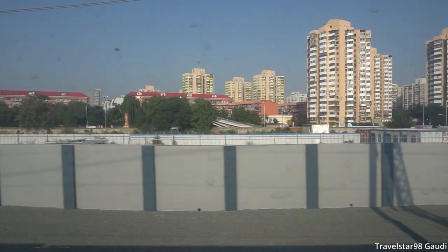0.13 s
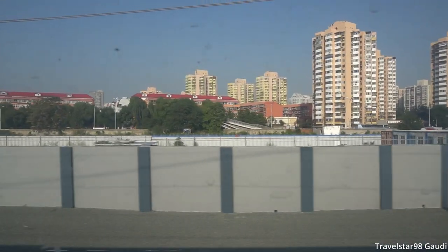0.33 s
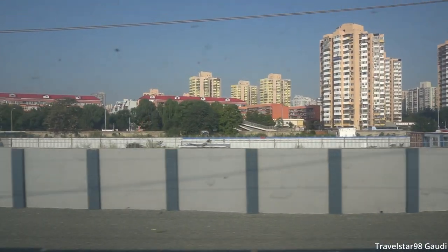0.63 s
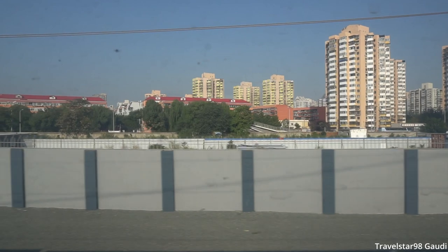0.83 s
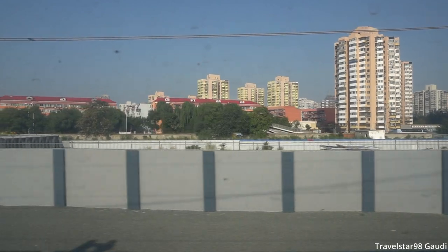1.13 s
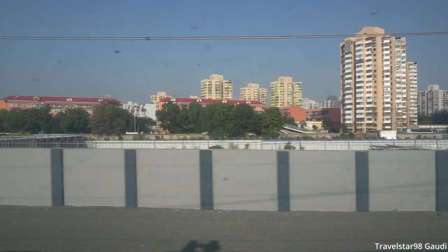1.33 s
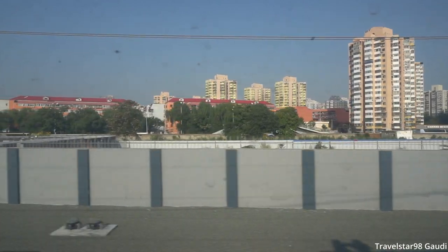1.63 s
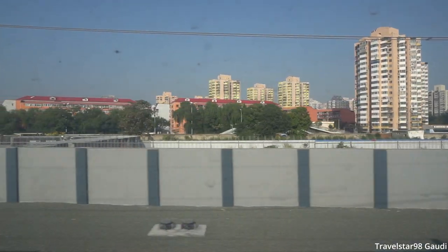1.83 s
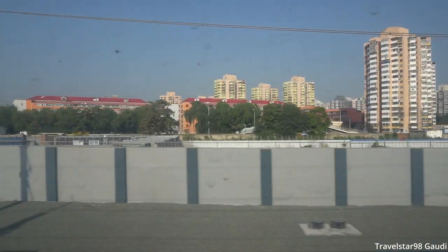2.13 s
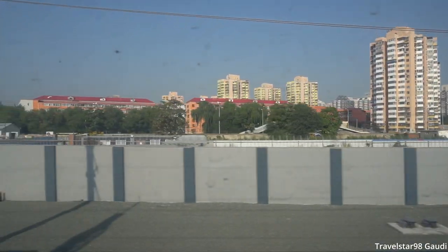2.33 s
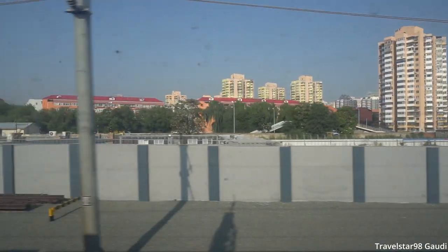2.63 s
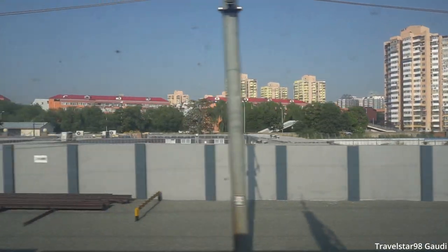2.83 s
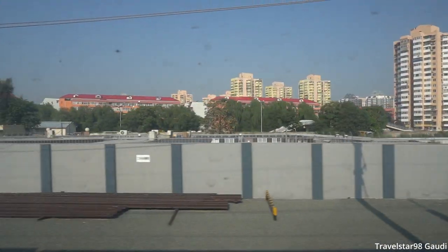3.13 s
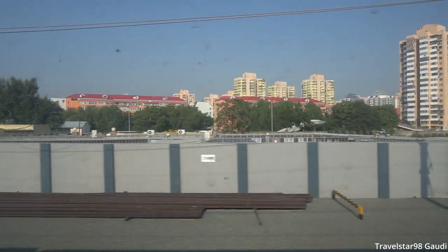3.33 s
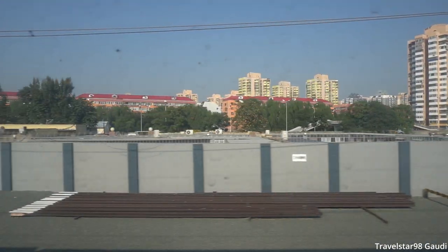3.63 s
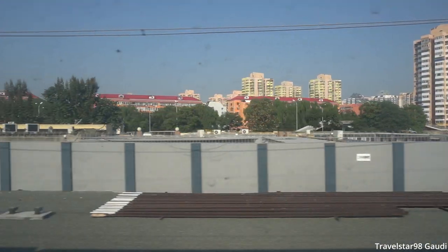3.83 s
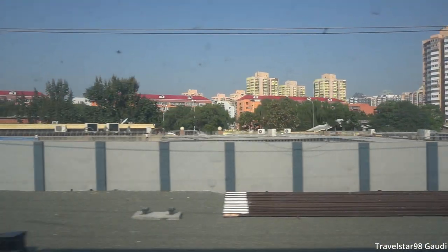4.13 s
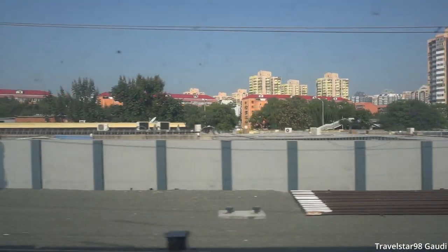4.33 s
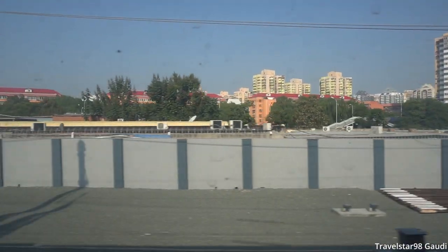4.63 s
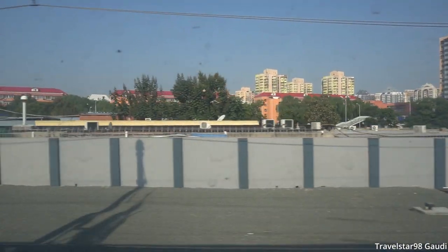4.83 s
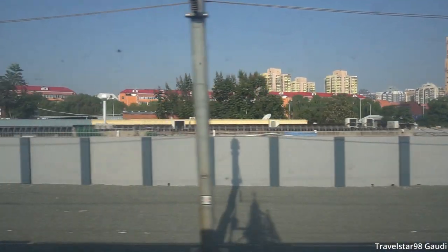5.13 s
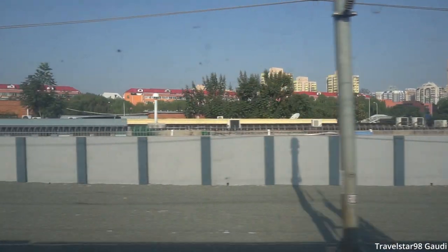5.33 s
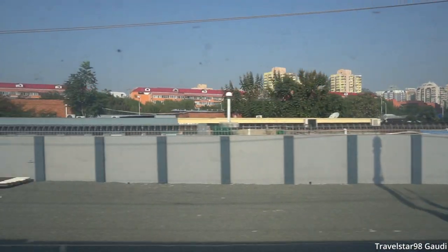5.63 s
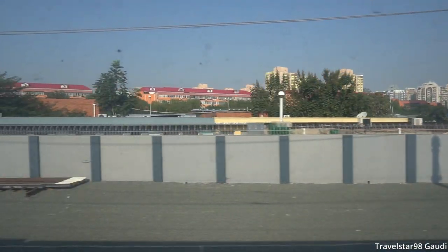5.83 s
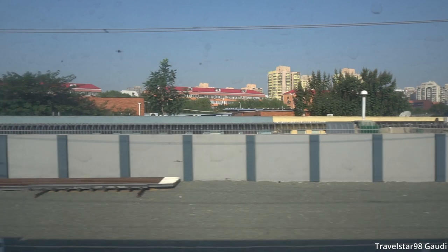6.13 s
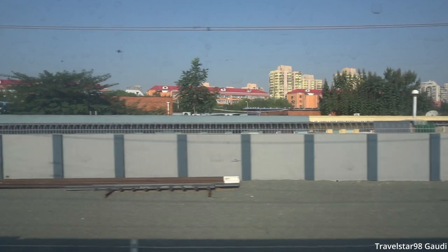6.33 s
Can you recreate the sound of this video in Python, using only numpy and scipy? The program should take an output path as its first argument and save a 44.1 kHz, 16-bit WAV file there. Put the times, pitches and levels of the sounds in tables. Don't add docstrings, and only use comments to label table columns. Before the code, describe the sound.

Inside a moving passenger train, a continuous low rumble dominates, its floor boom wavering gently under a softer, duller wheel roar. Muffled thuds over rail joints come irregularly, the firmest as a close double knock just before two seconds, then more near two and a half. Panels hum in short swells, fittings creak faintly and a loose part ticks. Two close microphones in the carriage add a light hiss.

```python
import sys
import numpy as np
from scipy import signal
from scipy.fft import rfft, irfft
from scipy.io import wavfile
from scipy.ndimage import uniform_filter1d

SR = 44100
rng = np.random.default_rng(int(sys.argv[2]) if len(sys.argv) > 2 else 0)


def file_out(sig):
    cols = np.atleast_2d(sig).T
    lim = np.clip(cols, -1, 1)
    pcm = np.round(lim * 32767).astype(np.int16)
    wavfile.write(sys.argv[1], SR, pcm)


def voltage_ratio(level):
    return 10 ** (np.asarray(level, float) / 20)


N = 285768
HZ, T = np.fft.rfftfreq(N, 1 / SR), np.arange(N) / SR

# t/s, level/dB
RAIL_ROUGHNESS = [(0.0, 3.5), (0.6, -0.2), (1.4, 1), (1.65, 2.2), (1.9, 4.5), (2.3, 2.5), (2.6, 2),
                  (2.95, 3), (3.2, 3), (3.6, 1), (3.95, 1), (4.25, 1.3), (4.6, -0.3), (5.2, 0.8),
                  (5.55, 0.9), (6.1, 0.5), (6.48, -1)]
# t/s (peak), floor boom level/dB, suspension sway level/dB, boom f/Hz
RAIL_DIPS = [(0.07, -34.5, -45, 82.15), (0.33, -33, -56, 93.4), (0.451, -37.5, -36, 90.2),
             (0.612, -30.5, -30.5, 83.8), (0.78, -33, -36, 90.6), (0.932, -35, -40, 85),
             (1.08, -53, -36, 83.4), (1.39, -37, -34, 79.24), (1.64, -37, -50, 68.76),
             (1.858, -31, -31, 98.75), (1.968, -35, -33, 83), (2.091, -37, -34, 92.84),
             (2.2, -30, -28, 91.7), (2.39, -37, -33, 89.9), (2.51, -30.5, -35.5, 82.5),
             (2.72, -34, -33, 76), (2.88, -29.5, -45, 77.9), (2.93, -25.5, -42, 77.75),
             (2.975, -24.5, -32, 82.3), (3.089, -33, -31, 84.6), (3.48, -35.5, -48, 83),
             (3.691, -34, -48, 79), (3.86, -50, -45, 75), (4.1, -56, -38, 71.56), (4.24, -43, -36, 77.97),
             (5.518, -36, -38, 88), (5.67, -49, -34, 79.7), (5.85, -33.5, -43, 74.5),
             (6.04, -31.5, -47, 81.7), (6.46, -33, -61, 79.4)]
# f/Hz, level/dB (per Hz)
SWAY_SPECTRUM = [(7.1, -46), (12, -16), (32, 0.5), (70, 2), (91, -25), (150, -120)]
# f/Hz, level/dB (per Hz)
BODY_SPECTRUM = [(60, -45), (110, 3), (135, -12), (172, -12.5), (200, -5.5), (260, -9), (320, -13.5),
                 (450, -15), (540, -25), (630, -30.5), (800, -49)]
# f/Hz, width/Hz, level/dB
BODY_MODES = [(101.3, 12, 8), (122, 40, -2), (431, 4.5, -12), (482, 25, -19.5), (571, 77, -35)]
# f/Hz, level/dB (per Hz)
ROAR_SPECTRUM = [(450, -2.5), (590, -4), (635, -10.5), (690, -2.5), (800, -5), (1100, -10.5), (1300, -13.5),
                 (1700, -12.5), (2300, -17.5), (3300, -20), (4500, -26), (6000, -35)]
# f/Hz, width/Hz, level/dB
WHEEL_MODES = [(875, 17, -2), (1083, 44, -5.5), (1404, 31, -12), (1520, 17, -8), (2068, 62, -14.5),
               (2710, 120, -15.5), (3600, 46, -17.5)]
# f/Hz, width/Hz, level/dB
HUM_MODES = [
    [(197.8, 19.7, 1), (222.5, 13, -2)],
    [(374.8, 24.5, 3)],
    [(714.5, 24.6, 11)],
    [(1750, 43, -2.5), (1811, 38, -1)],
    [(152.8, 30.4, 2)],
]
HUM_REST_DB = [-51, -57.5, -69, -75, -54.5]
HUM_FOLLOWS = [1.63, 0.9, 0.7, 0.4, 1.5]
# t/s (peak), level/dB, hold/s
SIDE_HUMS = [(0.135, -50, 0.13), (0.688, -44.5, 0.04), (0.877, -45, 0.031), (1.398, -46, 0.037),
             (2.033, -44.5, 0.044), (2.36, -45, 0.069), (3.0, -40.5, 0.116), (3.544, -52, 0.042),
             (3.702, -40.5, 0.045), (4.544, -48, .04), (5.195, -46.5, 0.044)]
# t/s (peak), level/dB, hold/s
ROOF_HUMS = [(0.79, -59, 0.032), (1.22, -60, .25), (1.7, -48, 0.025), (1.84, -46, .05),
             (2.34, -48.5, 0.062), (2.73, -47, 0.061), (2.98, -65, 0.042), (3.74, -54, 0.033),
             (4.24, -56, 0.021), (5.15, -50.5, 0.15), (5.52, -52.5, .25)]
# t/s (peak), level/dB, hold/s
RIM_HUMS = [(0.17, -69, 0.022), (0.58, -68, .04), (1.0, -57, 0.022), (1.2, -61.5, .08), (1.7, -60, .12),
            (2.36, -58.5, 0.14), (2.78, -62, .03), (3.1, -57.5, 0.076), (3.66, -58.5, 0.16),
            (4.17, -64, 0.026), (4.3, -61, 0.2), (4.66, -66, .15), (5.2, -63, .1)]
# t/s (peak), level/dB, hold/s
WEB_HUMS = [
    (0.16, -73, 0.09),
    (0.58, -66, .05),
    (3.0, -67, 0.29),
    (4.17, -67, .04),
    (4.66, -75, 0.061),
    (6.05, -71, 0.2),
]
# t/s (peak), level/dB, hold/s
SEAT_HUMS = [
    (1.58, -42, 0.044),
    (2.25, -44, .1),
    (2.62, -40.5, 0.04),
    (2.85, -44, .06),
    (3.0, -46, .06),
    (3.85, -43, .03),
    (4.2, -42.5, 0.046),
    (4.35, -43, 0.091),
    (6.15, -47.5, .06),
]
# t/s, blow level/dB, brightness level/dB (at 1 kHz), hold/s
JOINTS = [(0.54, -44, -4.5, 0.033), (0.954, -42, -3.5, 0.054), (1.331, -47, 6.5, .022),
          (1.664, -35.5, 0, 0.043), (1.809, -30, 3, 0.04), (1.864, -36.5, -7, 0.013),
          (2.577, -42.5, 6.5, 0.012), (2.709, -42.5, 6.5, 0.061), (2.77, -46.5, 0, 0.022),
          (3.079, -44, 2.5, 0.043), (3.683, -46.5, -21, 0.034), (4.298, -54, -4, 0.055),
          (5.845, -53.5, 11, 0.06)]
# f/Hz, level/dB (per Hz)
THUD_SPECTRUM = [(65, -32), (110, 0.5), (199, 4.5), (229, -3.5), (297, -10), (410, -5), (652, -18.5),
                 (714, -29.5), (771, -25), (1040, -30), (1260, -41), (1570, -40.5), (2400, -56),
                 (3120, -83), (5280, -120)]
# t/s, panel level/dB, wheel level/dB, pitch factor [1]
KNOCKS = [
    (1.659, -36, -52, 0.85),
    (1.689, -34, -62, 0.98),
    (1.809, -29, -49.5, 0.93),
    (1.868, -32.5, -61, 0.96),
    (2.586, -35, -65, 1.006),
    (2.618, -32.5, -73, 0.84),
]
# f/Hz, width/Hz, level/dB, length/s
PANEL_NOTES = [(201.6, 54, 0.7, 0.03), (282, 56, -15.5, 0.034), (405, 77, -14, 0.031)]
# f/Hz, width/Hz, level/dB, length/s
WHEEL_NOTES = [(933, 170, -2.5, 0.048), (1530, 51, -6, 0.053), (1770, 70, -11, 0.046),
               (2080, 90, -16.5, 0.048)]
# t/s, level/dB, f/Hz, width/Hz, length/s
CREAKS = [(0.065, -53.5, 490, 12.4, 0.31), (0.288, -61, 1770, 27, 0.07), (.5, -57, 446, 7.9, 0.27),
          (1.177, -59.5, 1740, 28, 0.055), (1.546, -36.5, 113.3, 10, 0.22), (1.931, -60, 1400, 40, 0.023),
          (2.733, -52, 363, 45, 0.026), (2.809, -53, 700, 180, 0.015), (2.92, -73, 4003, 38, 0.099),
          (3.021, -74, 3590, 60, 0.28), (3.039, -56, 955, 40, 0.028), (4.15, -44.5, 145.3, 45, 0.31),
          (4.452, -74, 3570, 93, 0.5), (5.82, -63, 1165, 72, 0.031), (6.423, -57, 2080, 230, 0.18)]
# f/Hz, left-right level/dB
CREAK_LEAN = [(150, 1.5), (500, 0.3), (1800, -2.2)]
# t/s, peak level/dB, f/Hz, length/s, left-right level/dB
TICKS = [
    (0.117, -65, 8350, 0.0034, -3),
    (2.741, -63.5, 10500, 0.0052, -3.5),
    (2.836, -58, 10200, 0.0024, -6),
    (3.277, -63, 10300, .005, -5),
    (3.3274, -58.5, 10000, 0.005, -5),
    (4.265, -70.5, 9500, 0.052, -3.5),
]
# f/Hz, level/dB (per Hz)
HISS_SPECTRUM = [(880, -37), (1500, -1), (1860, 0), (2350, -10), (4080, -8.5), (4400, -9.5), (11000, -12),
                 (14300, -54), (22000, -120)]
# f/Hz, left-right likeness [1]
SAME = [(60, 1.0), (140, 0.97), (340, 0.9), (820, 0.49), (1960, 0.13), (4700, 0.077), (11200, 0.26)]
# f/Hz, lead [rad]
LEAD = [(60, 0.055), (860, 0.73), (1810, 0.86), (2760, .3), (4000, 0.11)]
# f/Hz, left-right level/dB
LEAN = [(60, 0), (220, 0.5), (820, 0), (3040, -1), (11200, 0)]


def rolling():
    rough_db = roughness()
    s, boom_db, sway_db, boom_hz = np.transpose(RAIL_DIPS)
    hold = np.full(len(s), 0.01)

    def felt(rest_db, dip_db):
        return swelling(rest_db, zip(s, dip_db, hold), rise=0.061, t60=0.37)

    flutter = drift(16.5)
    boom = felt(-39.5 + 0.97 * rough_db, boom_db) * floor_boom(np.interp(T, s, boom_hz))
    sway = felt(-39 + 0.43 * rough_db, sway_db) * steadied(field(colour(SWAY_SPECTRUM)), 0.7)
    shake = felt(-42.5 + 0.99 * rough_db, boom_db - 12.5) * voltage_ratio(1.1 * flutter)
    body = shake * field(colour(BODY_SPECTRUM, BODY_MODES))
    roar = voltage_ratio(-59 + 0.67 * rough_db + 0.64 * flutter) * field(colour(ROAR_SPECTRUM, WHEEL_MODES))
    return boom + sway + body + roar


def floor_boom(hz, width=11, side_db=-24):
    turn = np.exp(2j * np.pi * np.cumsum(hz) / SR)

    def narrow_band():
        band = (drift(width) + 1j * drift(width)) * turn
        return steadied(band.real[None], 0.9)[0]

    mid = narrow_band()
    side = voltage_ratio(side_db) * narrow_band()
    return np.array([mid + side, mid - side])


def ringing():
    out, rough_db = 0, roughness()
    patches = (SIDE_HUMS, ROOF_HUMS, RIM_HUMS, WEB_HUMS, SEAT_HUMS)
    no_broadband = [(1, -99), (2, -99)]
    for modes, rest_db, follows, hums in zip(HUM_MODES, HUM_REST_DB, HUM_FOLLOWS, patches):
        level = swelling(rest_db + follows * rough_db, hums, rise=0.1, t60=0.34)
        waver = voltage_ratio(2.5 * drift(22))
        out = out + level * waver * steadied(field(colour(no_broadband, modes), 1.14), 0.62)
    return out


def joints():
    bright = 1 / (1 + (550 / (HZ + 1)) ** 6)
    thud = colour(THUD_SPECTRUM)
    low = steadied(field(thud * (1 - bright), 1.05), 0.95, size=500)
    high = steadied(field(thud * bright, 1.37), 0.78, size=300)
    t = T[::16]
    low_level, high_level = np.zeros((2, len(t)))
    for s, db, bright_db, hold in JOINTS:
        low_level += voltage_ratio(db) * burst(s + 0.0084, 0.2 * hold, hold, 7.9 * hold, t)
        high_level += voltage_ratio(db + bright_db - 13) * burst(s, 0.12 * hold, hold, 2.2 * hold, t)
    return np.interp(T, t, low_level) * low + np.interp(T, t, high_level) * high


def knocked():
    notes = []
    for s, panel_db, wheel_db, pitch in KNOCKS:
        for hz, width, db, length in PANEL_NOTES:
            notes.append((s + 3.5e-5 * hz, panel_db + db, hz * pitch, width, length))
        for hz, width, db, length in WHEEL_NOTES:
            notes.append((s, wheel_db + db, hz, width, length))
    return notes


def creaks():
    out = np.zeros((2, N + SR))
    t = T[:SR // 2]
    for s, db, hz, width, length in CREAKS + knocked():
        noise = rng.standard_normal((2, len(t)))
        shiver = evened(uniform_filter1d(noise, int(SR / (4.3 * width)) + 1))
        cycles = np.cumsum(hz + 0.59 * width * shiver, 1) / SR + rng.random((2, 1))
        a, b = np.sqrt(2) * np.sin(2 * np.pi * cycles)
        same = np.clip(1.28 * np.interp(hz, *np.transpose(SAME)), 0, 1)
        pair = np.array([a, same * a + np.sqrt(1 - same ** 2) * b])
        note = pair * burst(0, 0.1 * length, 0.64 * length, 1.1 * length, t)
        lean_db = np.interp(hz, *np.transpose(CREAK_LEAN))
        out[:, round(s * SR):][:, :len(t)] += panned(db, lean_db) * note
    return out[:, :N]


def ticks():
    out = np.zeros((2, N))
    for s, db, hz, length, lean_db in TICKS:
        snap = steadied(field(1 / (1 + ((HZ - hz) / 900) ** 2), 1.7), 0.8, size=60)
        rattle = voltage_ratio(-17) * burst(s + 0.014, 0.004, 0.02, 0.05)
        out += panned(db, lean_db) * (burst(s, 0.001, length, 0.01) + rattle) * snap
    return out


def hiss():
    return voltage_ratio(-66) * field(colour(HISS_SPECTRUM))


def roughness():
    return np.interp(T, *np.transpose(RAIL_ROUGHNESS))


def swelling(rest_db, events, rise, t60):
    t = T[::128]
    power = sum((voltage_ratio(db) * burst(s - rise, rise, hold, t60, t)) ** 2 for s, db, hold in events)
    return np.sqrt(voltage_ratio(rest_db) ** 2 + np.interp(T, t, power))


def burst(s, rise, hold, t60, t=T):
    u = t - s
    up = np.sin(np.pi / 2 * np.clip(u / rise, 0, 1)) ** 2
    return up * np.exp(-np.log(1000) * np.clip(u - rise - hold, 0, 2) / t60)


def colour(points, modes=()):
    f, db = np.transpose(points)
    power = voltage_ratio(np.interp(np.log(HZ + 1), np.log(f + 1), db, -99, -99)) ** 2
    for hz, width, peak_db in modes:
        power = power + voltage_ratio(peak_db) ** 2 / (1 + (2 * (HZ - hz) / width) ** 2) ** 2
    return np.sqrt(power)


def field(shape, alike=1):
    same, lead, lean_db = (np.interp(HZ, *np.transpose(table)) for table in (SAME, LEAD, LEAN))
    same = np.clip(alike * same, 0, 1)
    left, other = rfft(rng.standard_normal((2, N)))
    right = same * left * np.exp(-1j * lead) + np.sqrt(1 - same ** 2) * other
    return evened(irfft(np.array([left, right / voltage_ratio(lean_db)]) * shape, N))


def drift(per_s):
    return evened(irfft(rfft(rng.standard_normal(N)) * np.exp(-(HZ / per_s) ** 2), N))


def steadied(x, share, size=2000):
    level = np.sqrt(abs(uniform_filter1d((x ** 2).mean(0), size)) + 0.011)
    return evened(x / level ** share)


def panned(db, lean_db):
    return voltage_ratio([[db + lean_db / 2], [db - lean_db / 2]])


def evened(x):
    return x / np.sqrt(np.mean(x ** 2) + 1e-20)


def scene():
    return rolling() + ringing() + joints() + creaks() + ticks()


def band_limit(x):
    return signal.sosfilt(signal.butter(12, 11830, fs=SR, output="sos"), x)


def record(dry):
    heard = dry + hiss()
    limited = irfft(rfft(heard) * np.where(HZ < 11000, 1, voltage_ratio(-11)), N)
    mix = limited * np.minimum((T[-1] - T) / 0.004, 1)
    return band_limit(mix)


dry = scene()
out = record(dry)
file_out(out)
```